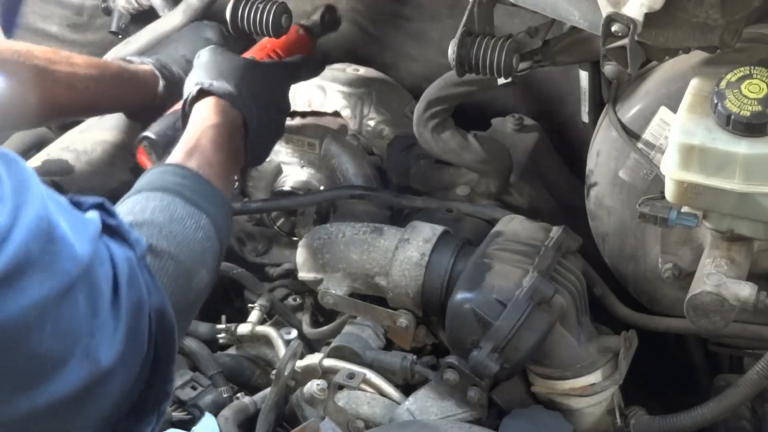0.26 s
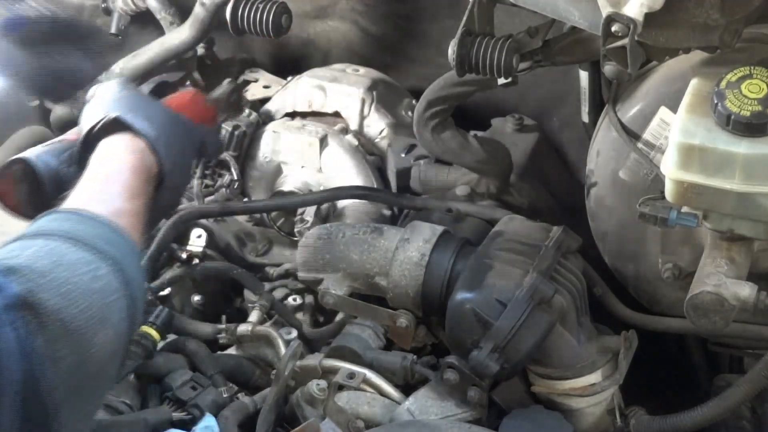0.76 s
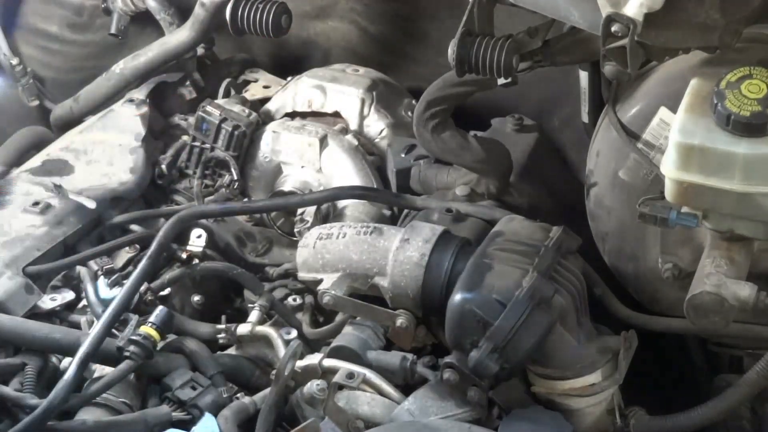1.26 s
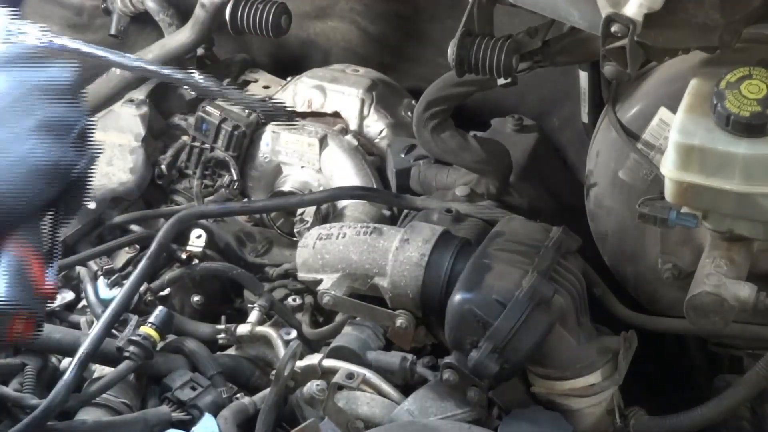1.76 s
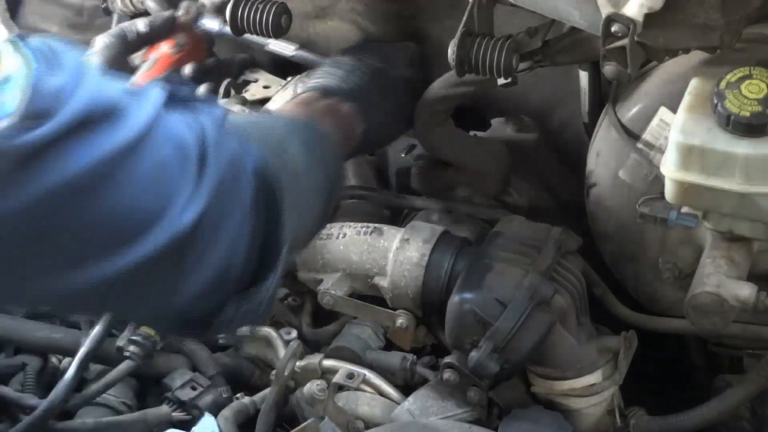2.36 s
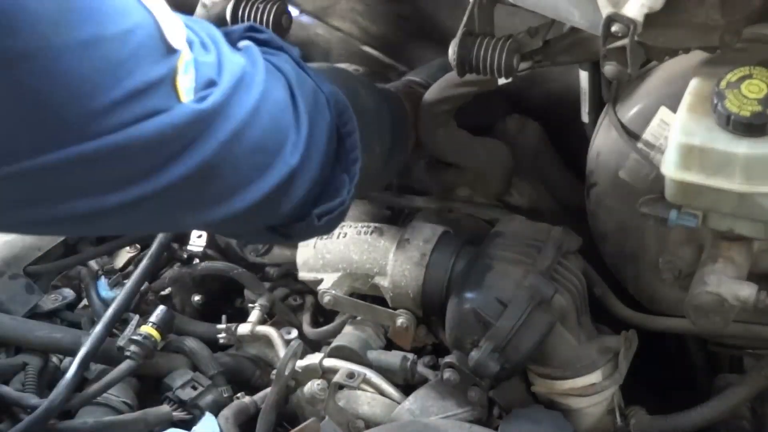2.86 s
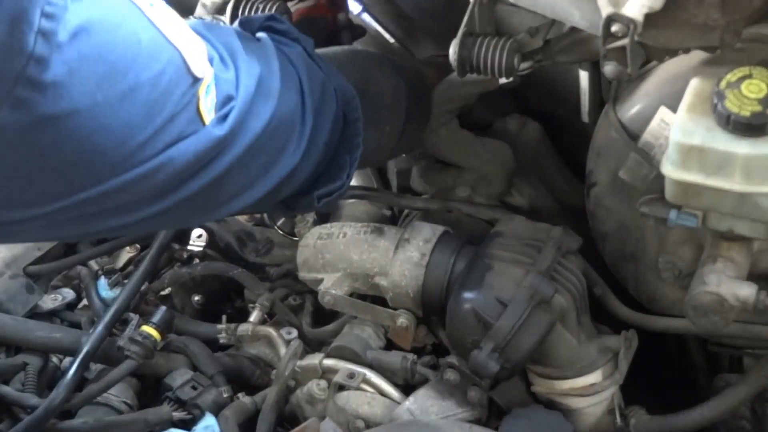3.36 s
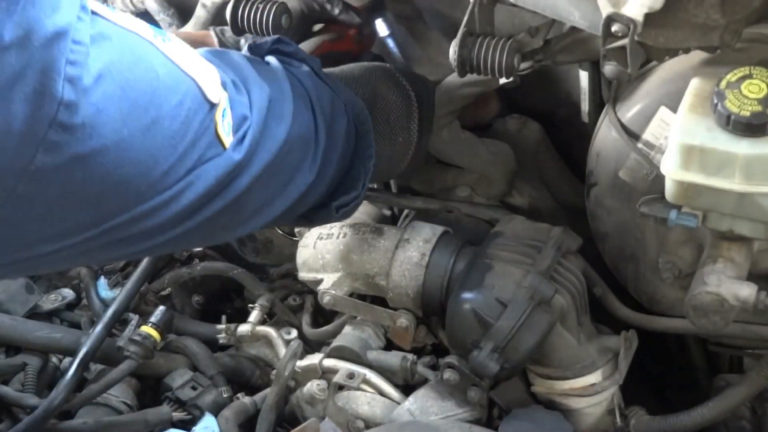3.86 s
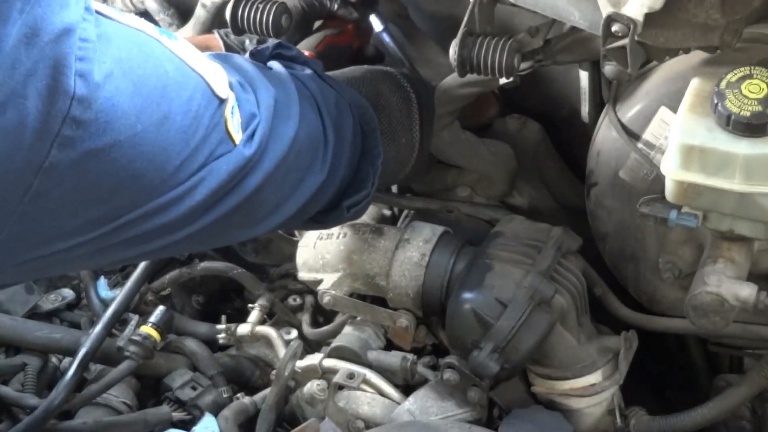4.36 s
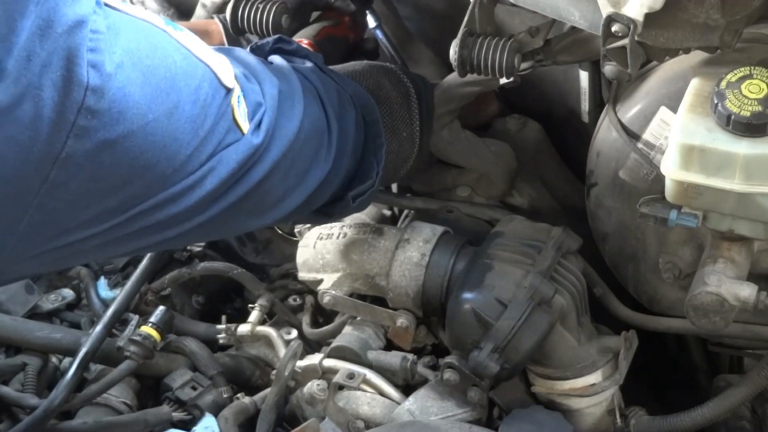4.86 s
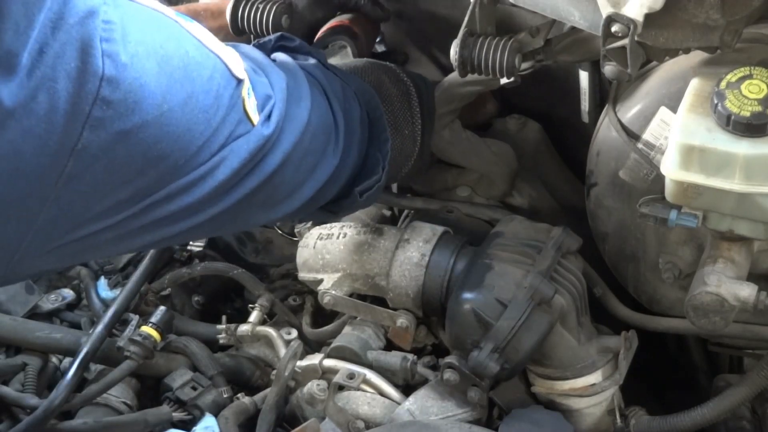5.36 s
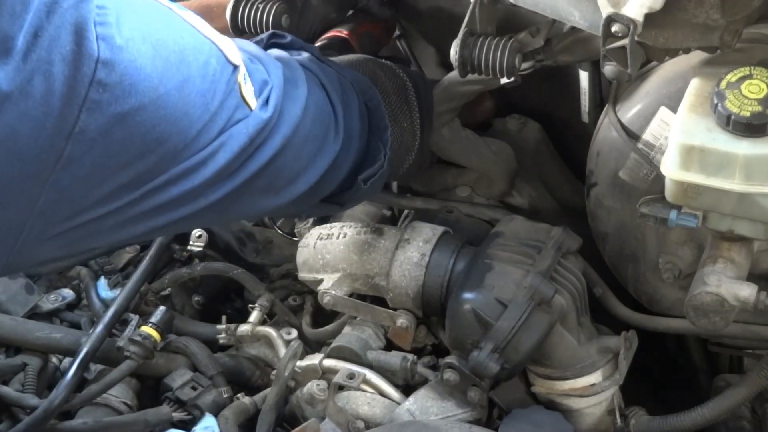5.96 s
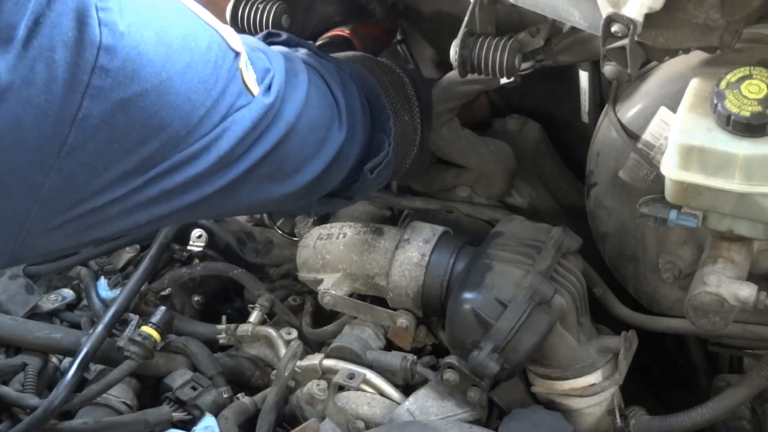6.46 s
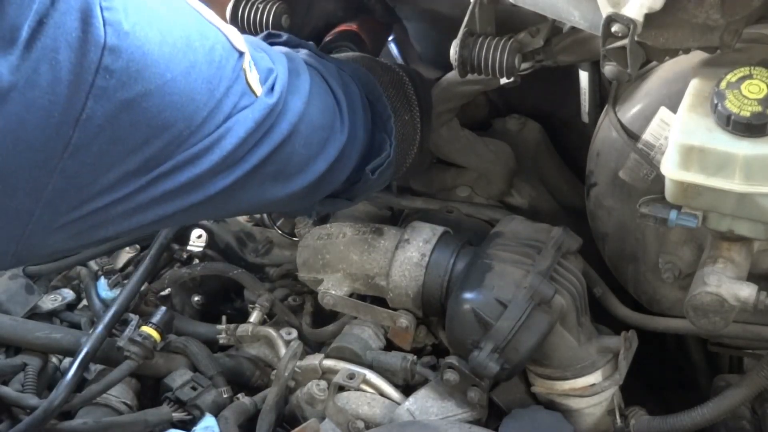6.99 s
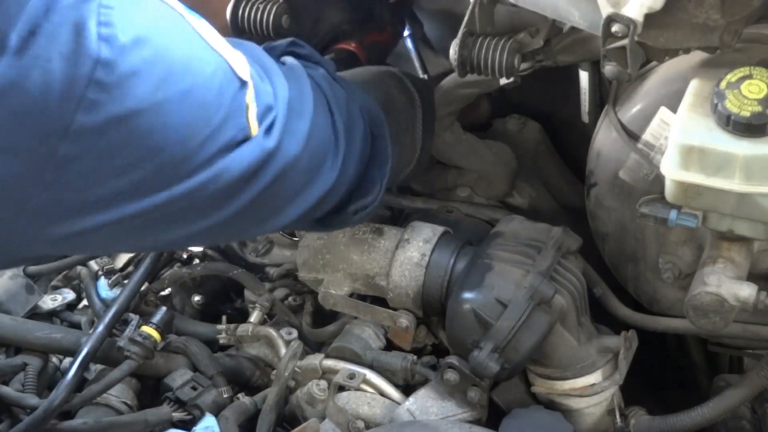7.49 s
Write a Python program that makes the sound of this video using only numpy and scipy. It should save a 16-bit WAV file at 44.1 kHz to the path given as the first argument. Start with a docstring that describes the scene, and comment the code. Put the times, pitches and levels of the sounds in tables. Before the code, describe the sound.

Metallic clinks, dull knocks and sleeve rustle up close, a short creak, then one brief harsh burst of a cordless impact wrench rattling to rest.

```python
"""Close by in an engine bay of a repair shop, gloves and sleeves rub (noise strokes) and a socket squeaks once.
Socket and extension clink on bolts and the tool knocks on the engine: noisy contact forces through resonances.
Later the socket creaks home, the trigger whistles (unsteady harmonics) and the gears kick the housing.
A cordless impact wrench hammers a bolt loose for half a second: timed cracks ring housing and socket.
It slows, stops with a clunk and rattles to rest; a few last knocks and a rub follow."""
import sys
import numpy as np
from scipy import signal
from scipy.fft import rfft, irfft
from scipy.io import wavfile
from scipy.ndimage import uniform_filter1d

SR = 44100
rng = np.random.default_rng(int(sys.argv[2]) if len(sys.argv) > 2 else 0)


def int16_out(signal):
    """Quantize to a 16-bit WAV file."""
    q = np.round(np.clip(np.atleast_2d(signal).T, -1, 1) * 32767)
    wavfile.write(sys.argv[1], SR, q.astype(np.int16))


N = 340893
TIME = np.arange(N) / SR

# the wrench speeds up, labours on the bolt and slows as the trigger is eased:
# (time [s], hammer blows [per s])
HAMMER_RATE = [(6.623, 45), (6.71, 72), (6.76, 61), (6.87, 59), (7.065, 35)]
# resonances of the steel parts: (frequency [Hz], width [Hz], relative level [dB])
STEEL_MODES = [(885, 45, -9), (1211, 60, -12), (1490, 100, -1), (1630, 80, 1), (1990, 90, -2),
               (2370, 70, -9), (3000, 160, -8), (3840, 110, -7), (4710, 70, -5)]
# resonances of the wrench housing: (frequency [Hz], width [Hz], relative level [dB])
WRENCH_MODES = [(325, 48, 1), (820, 110, 1), (1600, 90, -6), (1965, 150, 5), (2900, 220, 2), (3750, 400, 3)]
# high resonances of the loose socket: (frequency [Hz], width [Hz], relative level [dB])
SOCKET_MODES = [(10130, 2800, 5), (12780, 800, 11), (13500, 650, 1)]
# broad colour of steel touching steel: (frequency [Hz], relative level [dB])
CLINK_COLOUR = [(120, -26), (350, 18.5), (600, -4), (900, 6), (1700, -10.5), (2600, 14), (4500, 5),
                (7000, -14.5), (14000, -38)]
# broad colour of the bright tick of a contact: (frequency [Hz], relative level [dB])
TICK_COLOUR = [(1500, 10.8), (3500, 28), (8000, 32.8), (11000, 33.9), (13500, 29.3), (16000, 7.9)]
# broad colour of the working wrench: (frequency [Hz], relative level [dB])
HAMMER_COLOUR = [(80, -43.5), (170, -13.5), (260, 0.5), (550, -2.5), (1200, -2), (3600, -1), (5500, -1.5),
                 (7500, -1.5), (11000, -3.5), (16000, -6)]
# every steel contact lasts about as long
CLINK_CONTACT_S = 0.0021
HAMMER_DB = -34


def from_db(db):
    """Decibels to gain."""
    return 10 ** (np.asarray(db) / 20)


def rms_one(x):
    """Scale to unit rms."""
    return x / np.sqrt(np.mean(x ** 2) + 1e-20)


def at_level(x, db, size=1100):
    """Set the level of a hit's first 25 ms."""
    return x * from_db(db) / np.sqrt(np.mean(x[:size] ** 2))


def add(track, s, sound):
    """Mix a sound in at a time."""
    i = int(s * SR)
    track[i:i + len(sound)] += sound[:N - i]


def in_time(rows, outside=-150):
    """One curve per column, held at the outside value beyond its rows."""
    s, *columns = np.transpose(rows)
    return [np.interp(TIME, s, c, left=outside, right=outside) for c in columns]


def at_hz(points, hz):
    """Read a table on a log-frequency axis."""
    f, value = np.transpose(points)
    return np.interp(np.log(np.maximum(hz, 1)), np.log(f), value)


def drift(rate):
    """Slow chance: lines between random knots of spread 1, so many knots per second."""
    knots = rng.standard_normal(4000)
    return np.interp(TIME * rate, np.arange(len(knots)), knots)


def stroke(start, length, attack, release):
    """Envelope: rises, holds, then dies away."""
    t = TIME - start
    return np.clip(t / attack, 0, 1) * np.exp(-np.maximum(t - length, 0) / release)


def bump(centre, half):
    """Envelope: a soft arch around a time."""
    return np.exp(-((TIME - centre) / half) ** 2)


def high_pass(x, hz, order=1):
    """Take out the bass."""
    return signal.sosfilt(signal.butter(order, hz, "high", fs=SR, output="sos"), x)


def low_pass(x, hz):
    """Dull the treble gently."""
    return signal.sosfilt(signal.butter(1, hz, fs=SR, output="sos"), x)


def minimum_phase(gains):
    """Spectrum of the causal filter with these gains."""
    cepstrum = irfft(np.log(gains))
    half = len(cepstrum) // 2
    cepstrum[1:half] *= 2
    cepstrum[half + 1:] = 0
    return np.exp(rfft(cepstrum))


def even(burst, width_hz):
    """Take the broad chance colour out of a burst and keep its course in time."""
    spectrum = rfft(burst)
    power = uniform_filter1d(np.abs(spectrum) ** 2, int(width_hz * len(burst) / SR) + 1)
    return irfft(spectrum / minimum_phase(np.sqrt(power + 1e-12)))


def colour(x, spectrum, size=4096):
    """Causal filter of unit energy with the given spectrum."""
    gains = from_db(at_hz(spectrum, np.fft.rfftfreq(size, 1 / SR)))
    response = irfft(minimum_phase(gains))
    return signal.fftconvolve(x, response / np.linalg.norm(response))[:len(x)]


def resonate(x, modes):
    """Parallel resonances; the output has the energy of the input."""
    out = 0
    for hz, width, db in modes:
        r = np.exp(-np.pi * width / SR)
        poles = [1, -2 * r * np.cos(2 * np.pi * hz / SR), r * r]
        ring = signal.lfilter([1, 0, -1], poles, x + 1e-18)
        out = out + from_db(db) * np.sqrt(1 - r * r) * ring
    return rms_one(out) * np.std(x)


def contact(seconds, rise_s, grit_db, size=16384):
    """Force of one touch: uneven micro-impacts that come in clumps and die away."""
    t = np.arange(size) / SR
    uneven = sum(np.repeat(rng.standard_normal(size // step), step) for step in (32, 128))
    impacts = rng.standard_normal(size) * from_db(grit_db * uneven)
    force = impacts * np.exp(-t / seconds) * (1 - np.exp(-t / rise_s))
    return even(force, 160)


def strikes(rate, seconds, jitter_s, spread_db, grind_db):
    """Short cracks at the given rate, over gears that grind louder with speed; rms 1 while running."""
    at = np.flatnonzero(np.diff(np.ceil(np.cumsum(rate) / SR)) > 0)
    chance = rng.standard_normal((400, 2))[:len(at)]
    clicks = np.zeros(N)
    clicks[at + (chance[:, 0] * jitter_s * SR).astype(int)] = from_db(spread_db * chance[:, 1])
    age = np.arange(1024) / (seconds * SR)
    cracks = signal.fftconvolve(clicks, age * np.exp(1 - age))[:N]
    grind = from_db(grind_db) * rate / rate.max()
    force = (cracks + grind) * rng.standard_normal(N)
    return force / np.std(force[at[0]:at[-1]])


def shop_air(db=-67):
    """Steady room tone of the workshop: coloured noise."""
    # (frequency [Hz], relative level [dB])
    air_colour = [(15, -92), (25, 2), (58, 5), (114, 0), (354, -2), (734, -7), (1100, -7.5), (10700, -33),
                  (16000, -97)]
    return from_db(db) * colour(rng.standard_normal(N), air_colour)


def echoes(x, decay, size=32768):
    """Dense reflections that die band by band; about unit energy."""
    t, tail = np.arange(size) / SR, 0
    edges = np.geomspace(40, 18000, 10)
    for low, high in zip(edges, edges[1:]):
        band_filter = signal.butter(2, [low, high], "band", fs=SR, output="sos")
        band = signal.sosfilt(band_filter, rng.standard_normal(size))
        t60 = at_hz(decay, np.sqrt(low * high))
        band *= from_db(-60 * t / t60) * (1 - np.exp(-t / 0.00042))
        tail = tail + band / np.linalg.norm(band) * np.sqrt(2 * (high - low) / SR)
    return signal.fftconvolve(x, tail)[:N]


def engine_bay(x, bay_db=0.0, dull_hz=5500):
    """Direct sound plus quick reflections under the bonnet, whose pattern shifts as arm and tool move."""
    # ring time under the bonnet: (frequency [Hz], t60 [s])
    bay_decay = [(150, 0.55), (1000, 0.026), (12000, 0.024)]
    heard, posture = 0, 2 * drift(22)
    # two reflection patterns share the sound in changing parts
    for share in (np.cos(posture) ** 2, np.sin(posture) ** 2):
        response = from_db(bay_db) * low_pass(echoes(np.ones(1), bay_decay), dull_hz)
        response[0] += 1
        heard = heard + share * signal.fftconvolve(x, even(response, 220))[:N]
    return heard


def handling(swish_rub_db=-30.0, jiggle_db=-20.5, jiggles_per_s=45):
    """Gloves and sleeves drag over the tool in strokes of small catches; the loose socket jiggles along."""
    # drags as the hands move: (start [s], length [s], rubbing level [dB], cloth hiss level [dB])
    rub_strokes = [(0.0, 0.23, -58.5, -62.5), (0.309, 0.12, -54.5, -54.5), (1.514, 0.34, -73, -64),
                   (1.858, 0.3, -64.5, -88), (2.376, 0.46, -56, -65), (2.922, 0.25, -66, -57),
                   (3.297, 0.66, -77.5, -79.5), (7.451, 0.12, -64, -65)]
    # quick slides of glove and sleeve: (time [s], half length [s], level [dB])
    quick_slides = [(1.672, 0.011, -51.5), (1.823, 0.029, -50.5), (1.874, 0.0091, -53), (4.196, 0.054, -64)]
    # broad colour of rubbing: (frequency [Hz], relative level [dB])
    rub_colour = [(60, -10.5), (170, 2.5), (550, -6.5), (800, 1), (1200, -14), (1800, -6), (5000, -17.5),
                  (14000, -21)]
    # broad colour of cloth hiss: (frequency [Hz], relative level [dB])
    cloth_colour = [(1000, -26.5), (3000, -11), (6000, -12), (16000, -13)]
    # the sleeve never lies quite still
    rub, hiss = from_db(-75.5), from_db(-71.5)
    for start, length, rub_db, hiss_db in rub_strokes:
        drag = stroke(start, length, attack=0.071, release=0.092)
        rub = rub + from_db(rub_db) * drag
        hiss = hiss + from_db(hiss_db) * drag
    swish = sum(from_db(db) * bump(s, half) for s, half, db in quick_slides)
    catches = from_db(2.3 * drift(300) + 1.8 * drift(30))
    grain = rng.standard_normal((2, N)) * catches
    touches = rms_one((rng.random(N) < jiggles_per_s / SR) * rng.uniform(-0.75, 1, N))
    jiggle = colour(touches, CLINK_COLOUR) + resonate(touches, STEEL_MODES)
    rubbing = colour(grain[0], rub_colour) * (rub + swish * from_db(swish_rub_db))
    cloth = colour(grain[1], cloth_colour) * (hiss + swish)
    return rubbing + cloth + from_db(jiggle_db) * rub * jiggle


def squeak(s=0.237, hz=2020, bend_hz=45, db=-47):
    """The socket squeaks once as it turns on the bolt, in a little arch of pitch."""
    arch = bump(s, 0.013)
    pitch = hz - bend_hz * (1 - arch + drift(189) / 2)
    return from_db(db) * arch * np.sin(2 * np.pi * np.cumsum(pitch) / SR)


def knocks(ring_db=-3.5, damping=0.23, free_ring_s=0.013, lowest_cycles=2.1, tick_db=-64):
    """Long, dull contacts thump the panels and ring the part touched, clearer the sooner it is let go."""
    # tool and arm bump and scrape against the engine: (time [s], thump level [dB], clank level [dB],
    # contact time [s], rise time [s], ring [Hz])
    bumps_and_scrapes = [(0.41, -81, -44, 0.027, 0.003, 855), (0.467, -51, -47.5, 0.0034, 0.00078, 780),
                         (0.834, -51.5, -53.5, 0.042, 0.0037, 1220),
                         (0.881, -36, -41.5, 0.03, 0.00064, 187), (2.403, -33, -32.5, 0.021, 0.0011, 950),
                         (2.461, -39.5, -43.5, 0.0055, 0.00067, 155),
                         (2.621, -67, -32.5, 0.0073, 0.00029, 1610),
                         (3.019, -52.5, -54, 0.025, 0.0035, 1660),
                         (3.137, -47, -36.5, 0.012, 0.00092, 1680), (3.315, -56.5, -54, 0.077, 0.005, 1580),
                         (4.164, -71, -54, 0.015, 0.11, 1630), (4.289, -80, -61, 0.022, 0.011, 1700),
                         (4.617, -75, -32.5, 0.014, 0.00023, 1770), (4.644, -74, -41, 0.042, 0.0012, 1590),
                         (4.806, -52, -62, 0.053, 0.0037, 135), (4.931, -52, -54.5, 0.034, 0.017, 1230),
                         (5.099, -51, -53, 0.02, 0.00051, 1650), (5.198, -93, -53, 0.035, 0.0082, 1770),
                         (5.898, -55, -55.5, 0.032, 0.0053, 1140),
                         (7.138, -46.5, -44.5, 0.0071, 0.0008, 870), (7.17, -61.5, -64, 0.11, 0.0028, 174),
                         (7.525, -53.5, -56, 0.04, 0.0023, 1250), (7.675, -56.5, -59, 0.035, 0.0026, 1560)]
    # broad colour of the panels: (frequency [Hz], relative level [dB])
    thump_colour = [(35, 5), (60, -5), (130, 1), (200, 3), (300, 2), (500, -1.5), (900, -53.5)]
    # broad colour of the clank: (frequency [Hz], relative level [dB])
    clank_colour = [(100, -23), (300, 10.5), (520, 2), (780, 7), (1100, 2), (1800, -2.5), (2800, -9.5),
                    (4500, -14.5), (7000, -29.5), (14000, -50)]
    out = np.zeros(N)
    for s, thump_db, clank_db, seconds, rise_s, ring_hz in bumps_and_scrapes:
        force = contact(seconds, rise_s, grit_db=2.5)
        ringing = from_db(ring_db) * (1 + (free_ring_s / seconds) ** 2)
        body = colour(force, clank_colour)
        body += ringing * resonate(force, [(ring_hz, damping * ring_hz, 0)])
        # a bright scratch on top
        body += from_db(tick_db) * colour(force, TICK_COLOUR)
        # only a long push moves the panels at their deepest
        low_cut = min(lowest_cycles / seconds, 105)
        thump = high_pass(colour(force, thump_colour), low_cut, order=2)
        add(out, s, at_level(thump, thump_db) + at_level(body, clank_db))
    return out


def extension(ring_hz, focus_db_per_octave=9, size=16384):
    """Free ring of the steel rod; the modes near the pitch of the touch sound most."""
    # (frequency [Hz], relative level [dB], t60 [s])
    rod_modes = [(890, 1, 0.085), (1210, -4, 0.12), (1295, -12, 0.36), (1635, 0, 0.13), (3825, -2, 0.07)]
    t, out = np.arange(size) / SR, 0
    for hz, db, t60 in rod_modes:
        off_pitch_db = focus_db_per_octave * abs(np.log2(hz / ring_hz))
        out = out + from_db(db - off_pitch_db - 60 * t / t60) * np.sin(2 * np.pi * hz * t)
    return out


def clinks(modes_db=7.0, ring_width_hz=60, socket_db=-13.0, light_cut_hz=900, light_db=-48, octave_db=12,
           extension_seated_s=2.6):
    """Touches tick and ring socket and extension, one mode most; harder ones reach lower, high rings die fast."""
    # steel on steel: (time [s], clank level [dB], tick level [dB], ring [Hz],
    # ring level relative to the rest of the clank [dB])
    steel_touches = [(0.277, -46, -70, 1640, -9), (0.32, -54, -45.5, 3030, 0), (0.357, -45, -80, 1480, -3),
                     (0.461, -39, -51.5, 1530, -10), (0.527, -34.5, -38.5, 1680, -2),
                     (0.544, -46.5, -75, 1680, -13), (0.615, -51, -70, 4700, -10),
                     (0.666, -55, -36, 3000, -17), (0.686, -44.5, -48, 2870, 0),
                     (0.713, -46.5, -33.5, 2780, -1), (0.758, -60, -52.5, 2740, -8),
                     (2.133, -56, -84, 3830, -9), (2.411, -38.5, -55, 4070, -4),
                     (2.454, -40.5, -50, 5270, 1), (2.516, -48.5, -55.5, 3440, 1),
                     (2.62, -35.5, -76, 910, 6.5), (2.66, -49, -56, 1580, -18),
                     (2.686, -42.5, -67, 3660, -3), (2.84, -46.5, -53.5, 2080, -4.5),
                     (2.878, -50.5, -55.5, 2390, -6), (3, -47.5, -50.5, 2120, 1),
                     (3.136, -29, -36.5, 1165, -5.5), (3.16, -68, -44.5, 1710, -11),
                     (3.2, -50.5, -75, 1560, 0), (3.742, -53.5, -85, 1550, 1), (4.321, -54, -73, 1570, -1),
                     (4.932, -59.5, -85, 1320, 6), (5.732, -56.5, -90, 1650, 7.5),
                     (6.457, -59, -80, 8750, 2), (6.518, -62, -71, 2830, 1)]
    out = np.zeros(N)
    for s, clank_db, tick_db, ring_hz, ring_db in steel_touches:
        force = contact(CLINK_CONTACT_S, rise_s=0.0013, grit_db=5.0)
        steel = colour(force, CLINK_COLOUR) + from_db(modes_db) * resonate(force, STEEL_MODES)
        low_cut = min(light_cut_hz * 2 ** ((light_db - clank_db) / octave_db), light_cut_hz)
        steel = rms_one(high_pass(steel, low_cut))
        width = ring_width_hz + (ring_hz / 200) ** 2
        steel = steel + from_db(ring_db) * rms_one(resonate(force, [(ring_hz, width, 0)]))
        tick = colour(force, TICK_COLOUR) + from_db(socket_db) * resonate(force, SOCKET_MODES)
        add(out, s, at_level(steel, clank_db) + at_level(tick, tick_db))
        # the long extension rings on once it stands on the bolt
        if s > extension_seated_s:
            add(out, s, from_db(clank_db + ring_db) * extension(ring_hz))
    return out


def creak(s=6.217, slip_s=.025, db=-54, growth_db=1.5, count=3):
    """The socket is pressed home and slips a few times with a dull buzz, a little harder each time."""
    # the parts that rub: (frequency [Hz], width [Hz], level before each part rings twice [dB])
    creak_modes = [(330, 160, -9), (800, 210, 3), (1850, 420, -3), (3500, 900, -14)]
    out = np.zeros(N)
    for k in range(count):
        force = contact(0.0078, rise_s=0.0016, grit_db=2.0)
        buzz = 0
        for hz, width, part_db in creak_modes:
            mode = [(hz, width, 0)]
            # each part rings twice over, which keeps the treble out
            buzz = buzz + from_db(part_db) * resonate(resonate(force, mode), mode)
        add(out, s + k * slip_s, at_level(buzz, db + k * growth_db))
    return out


def trigger(whistle_hz=1885, whirr_db=17):
    """Chopped motor current sings unsteadily in the windings while the gears begin to whirr."""
    # the speed control whistles as the trigger is squeezed: (time [s], level [dB])
    squeeze = [(6.566, -88), (6.578, -58), (6.61, -63.5), (6.63, -93)]
    # (multiple of the whistle pitch, relative level [dB])
    harmonics = [(1, 2), (2, 4), (3, 3)]
    phase = 2 * np.pi * np.cumsum(whistle_hz + 25 * drift(180)) / SR
    tone = sum(from_db(db) * np.sin(round(k) * phase) for k, db in harmonics)
    level = from_db(in_time(squeeze)[0])
    spin = np.clip((TIME - squeeze[1][0]) / (squeeze[2][0] - squeeze[1][0]), 0, 1)
    whirr = from_db(whirr_db) * colour(rng.standard_normal(N), HAMMER_COLOUR)
    return level * (tone * (1 - spin / 2) + spin * whirr)


def jolts(housing_db=-1.0, ring_db=-7.0, ring_width_hz=300, hum_db=-3, hum_s=0.028):
    """The gears slam through their slack and kick the housing, which hums briefly at its lowest mode."""
    # the motor starts and brakes: (time [s], level [dB], fading time [s], ring [Hz])
    start_and_brake = [(6.611, -32, 0.0092, 2180), (7.061, -31.5, 0.016, 2560)]
    out = np.zeros(N)
    for s, db, seconds, ring_hz in start_and_brake:
        force = at_level(contact(seconds, rise_s=0.008, grit_db=3.0), db)
        housing = from_db(housing_db) * resonate(force, WRENCH_MODES)
        ring = from_db(ring_db) * resonate(force, [(ring_hz, ring_width_hz, 0)])
        add(out, s, colour(force, HAMMER_COLOUR) + housing + ring)
        hum = np.sin(2 * np.pi * WRENCH_MODES[0][0] * TIME)
        out += from_db(db + hum_db) * stroke(s, seconds, seconds, hum_s) * hum
    return out


def run_down(db=-38.0, ticks_per_s=170, fade_s=0.018):
    """After the last blow the gears rattle to rest, ever slower and softer."""
    # broad colour of the gears: (frequency [Hz], relative level [dB])
    gear_colour = [(150, 3), (320, -1), (2800, 13), (12000, -25)]
    coasting = stroke(HAMMER_RATE[-1][0], 0.022, 0.0096, fade_s)
    tick_rate = ticks_per_s * np.sqrt(coasting)
    teeth = strikes(tick_rate, seconds=.001, jitter_s=.001, spread_db=3, grind_db=-30)
    return from_db(db) * colour(teeth * coasting, gear_colour)


def wrench(attack_s=0.034, housing_db=-13.5, socket_db=5.5, bounce_db=-4.5, whine_db=-13, teeth_per_blow=61,
           breakaway_s=6.8, rattle_db=-34, rattle_fall_db_per_s=27):
    """Blows on the anvil ring the housing unevenly; the socket bounces four times as often, the gears whine."""
    rate = in_time(HAMMER_RATE, outside=0)[0]
    start, stop = HAMMER_RATE[0][0], HAMMER_RATE[-1][0]
    # the blows build up to a steady strength
    running = stroke(start, stop - start, attack_s, CLINK_CONTACT_S)
    blows = strikes(rate, seconds=.0011, jitter_s=.0005, spread_db=1.5, grind_db=-12)
    bounces = strikes(4 * rate, seconds=.0005, jitter_s=.0011, spread_db=2.5, grind_db=-18)
    force = (blows + from_db(bounce_db) * bounces) * running * from_db(HAMMER_DB)
    # the socket rattles most as the bolt breaks loose, less before and after
    rattle = from_db(rattle_db - rattle_fall_db_per_s * np.abs(TIME - breakaway_s))
    chatter = (bounces + blows / 2) * running * rattle
    housing = 0
    for hz, width, db in WRENCH_MODES:
        uneven_force = force * from_db(4 * drift(60))
        housing = housing + from_db(db) * resonate(uneven_force, [(hz, width, 0)])
    mesh_hz = teeth_per_blow * (rate + drift(200))
    whine = running * from_db(HAMMER_DB + whine_db) * np.sin(2 * np.pi * np.cumsum(mesh_hz) / SR)
    socket = from_db(socket_db) * resonate(chatter, SOCKET_MODES)
    return colour(force, HAMMER_COLOUR) + from_db(housing_db) * housing + whine + socket


def scene(close_db=1.0, shop_db=-9.5, side_db=-20.0, air_side_db=1.0):
    """Close sounds in the engine bay, the workshop beyond; nearly mono."""
    # ring time of the workshop: (frequency [Hz], t60 [s])
    shop_decay = [(100, 1), (300, 0.17), (2000, 0.39), (14000, 0.25)]
    near = clinks() + knocks() + wrench() + jolts() + run_down()
    near = near + trigger() + squeak() + creak() + handling()
    dulled = low_pass(near, 6500)
    air, air_side = shop_air(), shop_air()
    mid = from_db(close_db) * engine_bay(near) + from_db(shop_db) * echoes(dulled, shop_decay) + air
    # only reflections and room air reach the two close ports unequally, and least so in the bass
    side_decay = [(150, 0.59), (12000, 0.013)]
    oblique = from_db(side_db) * echoes(dulled, side_decay) + from_db(air_side_db) * air_side
    side = high_pass(oblique, 200)
    return mid + side * np.array([[1], [-1]])


def record(dry, low_cut_hz=68, peak_limit=0.35, cutoff_hz=15800):
    """The small microphone loses the deep bass; peaks are rounded and the top is cut steeply."""
    thin = high_pass(dry, low_cut_hz, order=2)
    rounded = peak_limit * np.tanh(thin / peak_limit)
    return signal.sosfilt(signal.ellip(10, .2, 80, cutoff_hz, fs=SR, output="sos"), rounded)


dry = scene()
out = record(dry)
int16_out(out)
```